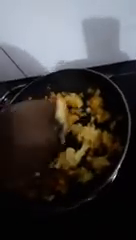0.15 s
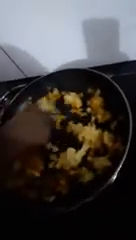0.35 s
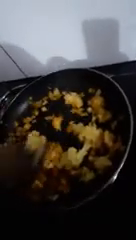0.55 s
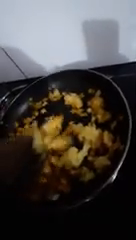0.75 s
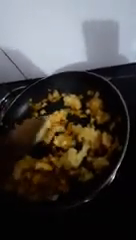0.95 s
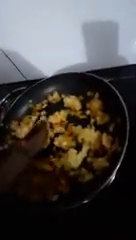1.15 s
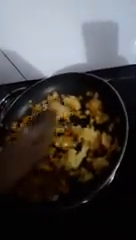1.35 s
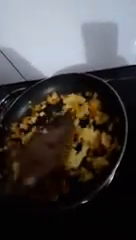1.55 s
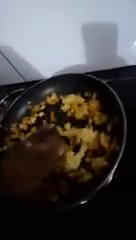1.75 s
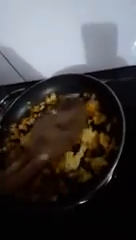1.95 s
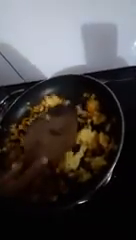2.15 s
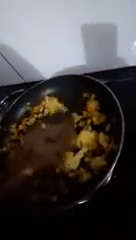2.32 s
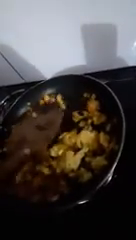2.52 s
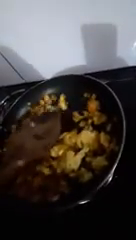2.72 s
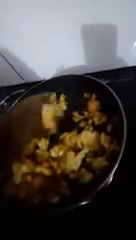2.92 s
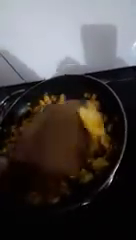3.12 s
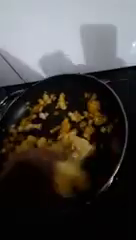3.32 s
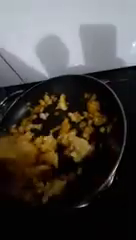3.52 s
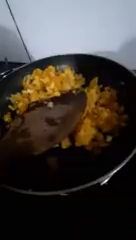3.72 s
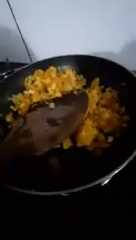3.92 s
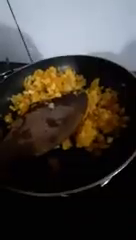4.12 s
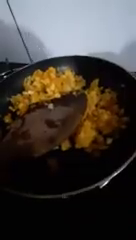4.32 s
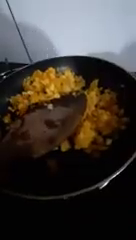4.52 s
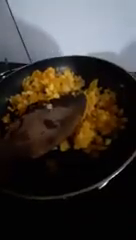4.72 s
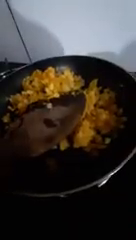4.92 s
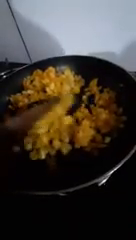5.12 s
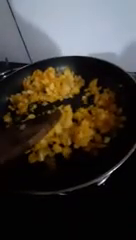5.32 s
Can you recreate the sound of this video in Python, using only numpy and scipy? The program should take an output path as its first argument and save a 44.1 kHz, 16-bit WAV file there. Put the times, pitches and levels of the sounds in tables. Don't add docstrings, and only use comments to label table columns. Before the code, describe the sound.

Steady fizzy frying, slightly to the left, with dry ticks and wet spits. A wooden spatula squelches and scrapes through mash, each push giving a low thump as the pan rocks on its stand. Short metallic knocks ring briefly with a small room answer; faint burner and room hum lie beneath the later, quieter hiss.

```python
import sys
import numpy as np
from scipy import signal
from scipy.fft import rfft, irfft, next_fast_len
from scipy.io import wavfile
from scipy.ndimage import map_coordinates

SR = 44100
rng = np.random.default_rng(int(sys.argv[2]) if len(sys.argv) > 2 else 0)


def boost(x):
    u = np.asarray(x, float) / 20
    return 10 ** u


def transcribe(u):
    v = np.clip(np.atleast_2d(u).T, -1, 1)
    q = np.round(v * 32767).astype(np.int16)
    wavfile.write(sys.argv[1], SR, q)


N = 240628
LEAD = SR // 10


def unit(x):
    return x / np.sqrt(np.mean(x ** 2) + 1e-20)


def along(points, hz):
    f, v = np.transpose(points)
    return np.interp(np.log(hz + 1), np.log(f + 1), v)


def curves(rows):
    s, *cols = np.transpose(rows)
    return [np.interp(np.arange(N) / SR, s, c) for c in cols]


def wobble(rate):
    knots = rng.standard_normal(int(N * rate / SR) + 4)
    return map_coordinates(knots, [np.arange(N) * rate / SR])


def swells(rows):
    t = np.arange(N) / SR
    return np.sqrt(sum(boost(2 * (db - 10 * np.abs(t - s) / half)) for s, half, db in rows))


def filtered(x, response):
    m = next_fast_len(N + SR // 2)
    return irfft(rfft(x, m) * response(np.fft.rfftfreq(m, 1 / SR)), m)[..., :N]


def colour(points):
    return lambda hz: boost(along(points, hz)) * np.minimum(hz / points[1][0], 1) ** 3


def sides(pan_db):
    return boost(np.array([pan_db / 2, -pan_db / 2]))


def port_lag(hz, lag_s):
    return np.exp(-1j * np.pi * hz * lag_s * np.array([[1], [-1]]))


# f/Hz, likeness/1
ALIKE = [(60, 1), (500, 0.51), (2000, 0.076), (5000, 0.11), (12000, 0.034)]


def paired(pair, response):
    def mid_side(hz):
        turn = np.arccos(np.clip(along(ALIKE, hz), -1, 1)) / 2
        return response(hz) * np.array([np.cos(turn), np.sin(turn)])
    mid, side = filtered(pair, mid_side)
    return np.array([mid + side, mid - side])


def grains(per_second, spread_db, smooth):
    size = boost(spread_db * np.minimum(rng.exponential(size=N), 3.5))
    size = size * (rng.random(N) < per_second / SR)
    decay = boost(-60 * np.arange(300) / SR / 0.0058)
    swell = np.convolve(size, decay)[:N]
    return rng.standard_normal((2, N)) * np.sqrt(smooth ** 2 + unit(swell) ** 2)


# f/Hz, level/dB, t60/s
PAN = [(279, 3, 0.065), (675, -1, 0.037), (784, 2, 0.044), (868, 6, 0.013), (1010, -3, 0.019),
       (1157, 1.5, 0.047), (1281, 2, 0.052), (1403, 6.5, 0.045), (1500, 6, 0.063), (1677, 2.5, 0.055),
       (2000, 8, 0.035), (2250, 0, 0.061), (2470, 5, 0.022), (2726, -7.5, 0.07), (3047, 1.5, 0.05),
       (3440, -1.5, 0.034), (3920, 4.5, 0.0075), (4840, -3, 0.016), (6155, -5.5, 0.044), (7020, 3, 0.01)]
# t/s, peak level/dB, low/dB, mid/dB, high/dB
EARLIER = [
    (-.01, -21, -14.5, -6, -13),
    (.038, -38, -26, -46, -37),
    (.165, -39.5, -12, -18, -26),
]
# t/s, peak level/dB, low/dB, mid/dB, high/dB
KNOCKS = [(0.7388, -21.5, -24, -3, -11.5), (0.798, -37.5, -8, -19, -21), (3.342, -38.5, -17, -8, -6),
          (3.432, -30.5, -14, 8.5, -0.5), (3.464, -37, -7, -22, -17), (3.6595, -34, -19, 1.5, 8.5),
          (3.722, -31.5, -18, -41, -21), (5.206, -35.5, 2, -17, 1.5), (5.212, -35.5, -14, 0, -24),
          (5.288, -62, 3, -14, -20), (1.896, -50, -36, -13, 15.5)]
# t/s, peak level/dB, low/dB, mid/dB, high/dB
NUDGES = [
    (1.235, -55, -29, 15, -44),
    (1.555, -42.5, -24.5, -9, -8),
    (3.765, -41.5, -21, 4.5, 9.5),
    (5.188, -49, 1, -6, 5),
]


def knocks():
    out, t = np.zeros((2, N + SR)), np.arange(SR // 3) / SR
    edge_band = signal.butter(3, [900, 7500], 'band', fs=SR, output='sos')
    contacts_s = ((EARLIER, 0.0042), (KNOCKS, 0.0026), (NUDGES, 0.016))
    blows = [(*row, contact_s) for rows, contact_s in contacts_s for row in rows]
    for s, db, low_db, mid_db, high_db, contact_s in blows:
        heard = out[:, LEAD + round(s * SR):][:, :len(t)]
        strike = [(270, low_db + 5.0), (750, 0), (1600, mid_db - 4.5),
                  (2900, (mid_db + high_db) / 2), (5000, high_db + 6.0)]
        rise = 1 - np.exp(-t / (0.4 * contact_s))
        hold = 1.35 * boost(-60 * t / (11 * contact_s)) + 0.17
        for hz, level_db, t60_s in PAN:
            turn = rng.uniform(-1.33, 1, 2)
            scatter_db = rng.normal(0, 4.1) + rng.normal(0, 1.0, (2, 1))
            phase = turn[:, None] * min(hz / 1500, 3)
            wave = np.sin(2 * np.pi * hz * (1 + 0.0086 * turn[0]) * t + phase)
            mode_db = db + 2.5 + level_db + along(strike, hz) + scatter_db - 60 * t / t60_s
            heard += boost(mode_db) * rise * hold ** min(hz / 700, 1) * wave
        crack_db = db + high_db + 8.0 - 60 * t / (7 * contact_s)
        crack = rng.standard_normal((2, len(t))) * boost(crack_db) * rise
        crack[:, 8] -= boost(db + high_db + 30.0 - 2200 * contact_s)
        heard += signal.sosfilt(edge_band, crack)
    return out


# t/s, peak level/dB,
# f/Hz, rise/s, t60/s
RINGS = [(0.0, -31, 2012, 0.0016, 0.094), (0.0, -27, 1354, 0.0018, 0.038), (0.0, -29.5, 782, 0.0075, .12),
         (0.024, -26, 717, .004, .05), (0.038, -21, 725, 0.002, 0.025), (0.055, -25, 705, 0.003, 0.03),
         (0.066, -38, 2050, .004, .06), (0.123, -38, 686, .002, .04), (0.2, -41.5, 760, 0.0074, 0.089),
         (0.74, -21.5, 283, 0.005, 0.057), (0.742, -27, 697, 0.0033, .05), (0.752, -33, 1330, .004, 0.094),
         (0.02, -29.5, 1000, .004, 0.055), (0.739, -34, 1500, 0.0011, 0.046),
         (3.665, -36, 1152, 0.0045, 0.18), (3.66, -21.5, 1500, .0007, 0.025),
         (3.66, -28.5, 854, .001, .025), (3.66, -28, 2300, .0006, 0.013), (3.66, -24, 4000, .0004, .012),
         (3.729, -30, 690, .003, .03), (3.768, -32, 760, .004, .03), (3.766, -30, 1960, 0.0079, 0.11),
         (3.775, -36, 2440, .008, 0.077), (3.748, -37, 690, 0.0069, 0.13), (3.35, -41, 2430, .004, .06),
         (5.288, -41, 296, 0.0037, 0.049), (0.75, -30, 2035, 0.0082, 0.13), (0.766, -28, 760, .005, .04),
         (0.794, -27, 720, 0.005, .035), (1.225, -40, 1461, .02, 0.23), (1.248, -38.5, 776, .008, 0.077),
         (1.565, -39.5, 660, 0.01, 0.11), (1.572, -42, 1307, 0.0063, 0.094), (1.755, -44, 784, .008, 0.069),
         (1.74, -40, 1500, .008, 0.069), (1.775, -44, 1294, 0.008, 0.081),
         (3.341, -30.5, 650, 0.0025, .08), (3.432, -16.5, 910, 0.00068, 0.018),
               (3.432, -26, 1500, 0.0011, .07), (3.432, -27.5, 1284, .001, 0.045),
               (3.46, -37, 817, .004, 0.065), (3.497, -36, 2050, .005, .04), (3.481, -36, 1450, .004, .04),
               (3.432, -22, 4600, .0003, .009), (3.436, -30, 280, .003, 0.088),
               (3.432, -25, 6800, 0.00027, 0.007), (3.343, -37, 298, .004, 0.075),
               (3.464, -32, 910, .002, .03), (3.721, -27, 620, 0.0022, 0.045),
               (5.207, -21, 268, 0.0061, 0.065), (5.208, -30, 426, 0.0043, .05),
               (5.21, -29.5, 890, .003, 0.048), (5.23, -32, 1183, 0.0028, 0.05),
               (5.232, -38, 327, .004, 0.037), (5.25, -37, 1400, .004, .05), (5.212, -34, 705, .002, .03),
               (5.335, -53, 1950, .01, .2), (5.265, -41.5, 250, 0.0045, 0.047), (5.31, -54, 898, .02, 0.38)]


def rings():
    out, t = np.zeros(N + SR), np.arange(SR // 3) / SR
    for s, db, hz, rise_s, t60_s in RINGS:
        level = boost(db + 3 - 60 * t / t60_s) * (1 - np.exp(-(t / rise_s) ** 2))
        out[LEAD + round(s * SR):][:len(t)] += level * np.sin(2 * np.pi * hz * t)
    return out


# t/s, peak level/dB, push or pull/1, half width/s
CLICKS = [
    (0.7394, -14.5, -1, .00016),
    (3.4326, -3.5, -1, 0.000082),
    (3.6601, -5.5, 1, 0.000077),
    (3.6608, -19, -1, .00012),
    (5.2073, -22, 1, .00006),
    (5.2142, -25, -1, .0002),
]


def clicks():
    t = np.arange(N + SR) / SR - .1
    out = np.zeros(N + SR)
    for s, db, way, half_s in CLICKS:
        middle = LEAD + round(s * SR)
        at = slice(middle - 90, middle + 90)
        u = (t[at] - s) / half_s
        out[at] += way * boost(db) * (1 - u ** 2) * np.exp(-u ** 2 / 2)
    return out


def skids():
    t = np.arange(N) / SR
    whole, upper = 0, 0
    for s, db, _, mid_db, _ in EARLIER + KNOCKS:
        fall_db = 60 * np.where(t < s, (s - t) / 0.041, (t - s) / 0.24)
        power = boost(2 * (min(db - 5, -35) - fall_db))
        whole = whole + power
        upper = upper + power * boost(2 * (-3.5 + 0.47 * mid_db))
    return np.sqrt(whole), np.sqrt(upper)


def steel(modes):
    def response(f):
        total = 0
        for k, (c, db, t60_s) in enumerate(modes):
            peak = 1j * f * 30 / (c * c - f * f + 1j * f * 4 / t60_s)
            total = total + boost(db - 2.0 * c / 1000) * peak * (-1) ** k
        return total
    return response


# t of most pressure/s, half length/s, squelch level/dB,
# pan ringing above it/dB, spray above it/dB
STROKES = [(0.0, .06, -50, -6, -5), (0.244, 0.21, -65.5, 10.5, 20), (0.462, 0.071, -49, -6, -3),
           (0.735, 0.04, -46, -23, 0), (1.07, 0.037, -49, -2, -10), (1.25, 0.072, -46.5, -1, 6),
           (1.59, 0.12, -47, -3.5, -1), (1.762, 0.1, -51, 3.5, 4), (2.064, 0.34, -55.5, -15, -7),
           (2.184, 0.22, -52, -4, 7), (2.79, 0.045, -49.5, -8, 1), (3.285, 0.064, -44, -25, 4),
           (3.356, 0.06, -44.5, -8.5, 4), (3.664, 0.037, -48, -12, -7), (3.76, 0.037, -41.5, -1.5, 6.5),
           (4.472, 0.021, -59, -1, -4), (5.019, 0.038, -51, -12, 9), (5.179, 0.084, -51.5, -11, 4.5),
           (5.383, 0.23, -65.5, 10, -3)]
# f/Hz, level/dB per Hz
MASH = [(1060, -14), (1800, -8), (2010, -7), (2540, -4), (3100, 0.5), (4300, -1), (5290, 2.5), (5730, -3),
        (6000, -0.5), (7800, -57), (13200, -120)]


def drag():
    strength, (skid, bright) = boost(curves(SIZZLE)[0]), skids()
    tremble, simmer = boost(-17.5) * strength, boost(-12) * strength
    rub = np.hypot(tremble, swells([(s, half, db + up) for s, half, db, up, _ in STROKES]))
    squelch = np.hypot(simmer, swells([row[:3] for row in STROKES]))
    slips = grains(per_second=200, spread_db=0, smooth=2.3)
    contact = np.hypot(rub, skid)
    force = contact * boost(0.66 * wobble(22.24))
    upper = np.clip(np.hypot(boost(-1) * rub, bright) / contact, 0, .98)
    ring = 0
    for share, modes in ((np.sqrt(1 - upper ** 2), PAN[1:4]), (upper, PAN[4:11])):
        response = steel(modes)
        ring = ring + paired(force * share * slips, response) / np.std(paired(slips, response))
    mash = unit(paired(grains(per_second=300, spread_db=3.5, smooth=2.5), colour(MASH)))
    wet = np.hypot(squelch, boost(-9.5) * skid)
    return ring + wet * boost(3.0 + 1.3 * wobble(25.38)) * mash


# t of most force/s, level/dB, build-up for 60 dB/s, t60/s, bright above it/dB
SCRAPES = [(0.0, -33, .002, 0.36, 0), (0.742, -38, 0.06, 0.33, -1.5), (3.345, -38, 0.01, 0.11, -4),
           (3.436, -36, 0.01, 0.19, 1.5), (3.664, -39, 0.02, 0.09, 9.5), (3.724, -40.5, 0.1, .1, -2),
           (3.781, -40, 0.13, 0.043, 6.5), (5.208, -34.5, 0.07, 0.15, -4), (5.235, -41, 0.18, 0.11, -5),
           (5.292, -55, 0.4, .1, 2), (1.26, -64, -0.05, .12, -5), (0.42, -56.5, 0.1, .12, 6)]
# f/Hz, level/dB per Hz
DULL = [(120, -34), (220, 0), (520, -3), (850, -4), (1400, -19), (3000, -60)]
# f/Hz, level/dB per Hz
BRIGHT = [(600, -26), (1000, -14), (1600, 2.5), (2400, -1), (3600, -7.5), (6000, -14), (9000, -65)]


def grit():
    t = np.arange(N) / SR
    dull, bright = 0, 0
    for s, db, rise_s, t60_s, bright_db in SCRAPES:
        fall_db = 60 * np.where(t < s, (s - t) / abs(rise_s), (t - s) / t60_s)
        power = boost(2 * (db - fall_db))
        dull = dull + power
        bright = bright + power * boost(2 * bright_db)
    slips = grains(per_second=150, spread_db=3.0, smooth=1.9)
    body, edge = unit(paired(slips, colour(DULL))), unit(paired(slips, colour(BRIGHT)))
    return np.sqrt(dull) * body + np.sqrt(bright) * edge


# t/s, peak level/dB, f/Hz
THUMPS = [(0.102, -38.5, 126), (0.745, -37.5, 120), (0.967, -41, 140), (1.244, -39, 147), (1.795, -41, 137),
          (2.087, -41, 117), (2.301, -40.5, 140), (2.59, -40.5, 142), (2.864, -39.5, 131),
          (3.096, -41.5, 114), (3.372, -36.5, 136), (3.437, -48, 216), (3.668, -42, 140), (3.812, -34, 123),
          (4.707, -42, 118), (4.831, -45.5, 145), (4.971, -42, 134), (5.185, -36, 126), (5.334, -38, 143)]


def thumps():
    before = SR // 50
    out, t = np.zeros(N + SR), np.arange(-before, SR // 12) / SR
    for s, db, hz in THUMPS:
        u = t * hz
        rebound = 0.68 * np.exp(-(u / 0.72) ** 2) + 0.091 * np.exp(-u / 0.56)
        swell = np.where(u < 0, np.exp(-(u / 0.68) ** 2), rebound)
        foot = 0.68 * np.exp(-(u / 0.046) ** 2)
        push = np.cos(2 * np.pi * u) * swell + foot
        out[LEAD - before + round(s * SR):][:len(t)] += boost(db + 1.5) * push
    f = np.fft.rfftfreq(len(out), 1 / SR)
    counter = 1 + .6j * f * 25 / (60 ** 2 - f * f + 1j * f * 14)
    return irfft(rfft(out) * counter * port_lag(f, lag_s=0.00032), len(out))


# t/s, level/dB, left-right/dB
SIZZLE = [(0.0, -45.5, 5), (0.3, -46.5, 4.5), (0.6, -44, 5), (0.8, -43, 4), (1.1, -41.5, 4.5),
          (1.45, -44, 4), (1.9, -43.5, 2.5), (2.1, -46, 4.5), (2.6, -43, 3.5), (3.1, -44.5, 5),
          (3.5, -46, 2.5), (3.72, -41.5, 7.5), (3.96, -45, 6), (4.02, -52.5, 6), (4.28, -54.5, 11.5),
          (4.45, -50.5, 4.5), (4.95, -52.5, 8.5), (5.46, -51.5, 7)]
# t/s, half length/s, level/dB
FLARES = [
    (1.533, 0.031, -40),
    (1.6, 0.093, -41.5),
    (1.757, 0.073, -48),
    (3.29, .08, -42),
]
# f/Hz, level/dB per Hz
FIZZ = [(2650, -3), (4500, -10.5), (5280, -10), (5740, -3), (6550, 4), (7970, -3.5), (8680, -17.5),
        (9500, -21.5), (12400, -48), (20900, -120)]
# f/Hz, level/dB per Hz
SPRAY = [(5000, -36), (8500, -20), (9520, -10.5), (10900, -2), (11700, 0), (13900, -1), (15200, -6),
         (16000, -0.5)]


def sizzle():
    strength_db, pan_db = curves(SIZZLE)
    bare, stirred = boost(strength_db) * sides(pan_db), sides(4.5)[:, None]
    stir_fizz = swells([(s, half, db + 0.5) for s, half, db, *_ in STROKES] + FLARES)
    stir_spray = swells([(s, half, db + up) for s, half, db, _, up in STROKES])
    coarse = np.hypot(boost(-4.5) * bare, stirred * stir_fizz)
    fine = np.hypot(bare, stirred * stir_spray)
    bursts = grains(per_second=360, spread_db=4.0, smooth=1.94)
    flicker_db = 0.5 * wobble(17) + 0.5 * wobble(45)
    fizz = boost(0.31 * wobble(29.7)) * unit(paired(bursts, colour(FIZZ)))
    spray = unit(paired(bursts, colour(SPRAY)))
    return boost(2.0 + flicker_db) * (coarse * fizz + fine * spray)


def burst_layers(bubbles):
    out, t = np.zeros((3, 2, N + SR)), np.arange(500) / SR
    for s, db, splat_db, spray_db, pan_db, length_s in bubbles:
        u = t / length_s
        shape = (1 - np.exp(-6 * u)) * np.exp(-2.5 * u)
        burst = unit(rng.standard_normal(len(t)) * shape) * np.sqrt(u.max()) * 0.16
        levels = boost(db + np.array([splat_db + 12.5, 3, spray_db + 4.5]))[:, None, None]
        out[..., round((s + .0007) * SR):][..., :len(t)] += levels * sides(pan_db)[:, None] * burst
    spectra = (MASH, FIZZ, SPRAY)
    return sum(filtered(part[:, :N], colour(points)) for part, points in zip(out, spectra))


# t/s, peak level/dB, spray/dB, left-right/dB
POPS = [(0.148, -30.5, 1.5, 10), (0.391, -32.5, 0, 17), (0.5468, -29.5, 0, 11), (0.6935, -31, -4, 13),
        (0.802, -34, -4, 13), (1.0318, -31, 7, 10), (1.2085, -31, 0.5, 11), (1.4331, -30.5, -10, 9),
        (1.4768, -23, -18, 5.5), (1.5295, -36.5, 6, 12), (1.5957, -29, -29, 23), (1.7267, -33, 1.5, 16),
        (1.9666, -36, -14, 16), (2.009, -43, 4, 29), (2.361, -37, -16, 10), (3.15, -31, -5, -11),
        (3.715, -31, 5, -1), (3.837, -31, 3.5, 7), (3.857, -47, 13, 14), (3.8862, -38, 12, 11),
        (3.9335, -45, -10, 3), (0.261, -38.5, 3, 9), (5.011, -39, -6, -5), (5.018, -41.5, 9, -9),
        (5.127, -34.5, -10, 9)]
# t/s, peak level/dB, spray/dB, left-right/dB
MORE_POPS = [(0.4813, -43, 5, 5), (0.7347, -40, 8, 6), (0.8864, -42, 5, 9), (1.0545, -52, -6, -13),
             (1.2481, -35, 4, 3), (1.3071, -29, -12, 4), (1.449, -38, -1, 5), (1.626, -39, -11, 2),
             (1.8153, -40, -1, 2), (1.9865, -41, -12, -1), (2.0454, -37, -10, 2), (2.6628, -35, -13, 5),
             (2.9731, -44, 4, 13), (3.4201, -37, -4, 14), (3.531, -43, 6, 8), (3.561, -42, 4, 8),
             (3.6097, -46, 9, 8), (3.6496, -37.5, 6.5, 9), (3.68, -43, 9, 14), (3.697, -43, 9, 10),
             (3.803, -47, 0, 10), (3.8167, -38, 5, 8), (3.8706, -39, 10, 10), (3.912, -44, 8, 6),
             (3.9584, -43, 9, 6), (3.972, -34, -1, 2), (4.9955, -50, 11, -10)]
# t/s, peak level/dB, low
# splat/dB, spray/dB, left-right/dB
SPLATS = [(0.418, -30, -32, -28, 12), (0.759, -31.5, -15, 1, 12), (0.9772, -38, -5.5, -2, 15),
          (1.0663, -29.5, -25, -20, 17.5), (1.506, -27.5, -13, -6, 11), (1.669, -33.5, -30, -6, 19),
          (1.897, -30, -10.5, -13, 22.5), (2.132, -38, -7.5, -1, 12), (2.434, -41, 0, -9, 4),
          (2.505, -35.5, -18, 1, 8), (2.5813, -29, -22, 4, 21), (3.2188, -30, -9, 5, 7),
          (3.291, -37, -19, -27, 3), (3.3556, -31, -15, -13, 9), (3.432, -25, -4, -39, 12),
          (3.5074, -33, -19, -1, 6), (3.576, -30.5, -13, -7, 6), (3.629, -43, -13, 4, 0),
          (3.66, -28, 6, -14, 8), (3.8706, -34, -17, 3, -2), (5.071, -37, -16, -25, 6),
          (5.2073, -29, -15, -21, 17)]
# t/s, peak level/dB, low splat/dB, spray/dB, left-right/dB
SPITS = [
    (2.578, -16, -28, 0, 6),
    (2.582, -28.5, -31, -6, 23.5),
    (5.444, -28, -23, -6, 12.5),
]


def pops():
    dry_splat_db = -38
    bubbles = [(s, db, dry_splat_db, *rest, 0.0019) for s, db, *rest in POPS]
    bubbles += [(*row, 0.0019) for row in SPLATS]
    bubbles += [(*row, 0.005) for row in SPITS]
    bubbles += [(s, db, dry_splat_db, *rest, 0.0022) for s, db, *rest in MORE_POPS]
    return burst_layers(bubbles)


# f/Hz, t60/s
KITCHEN = [(100, 0.26), (600, 0.38), (2000, 0.38), (6000, 0.42), (14000, 0.17)]


def kitchen(x):
    out, step = np.zeros((2, x.shape[1] + SR)), SR // 4
    for start in range(0, x.shape[1], step):
        hz, t, z = signal.stft(rng.standard_normal((2, SR // 2)), SR, nperseg=256)
        share = np.clip(along(ALIKE, hz), 0, 1)[:, None]
        z[1] = share * z[0] + np.sqrt(1 - share ** 2) * z[1]
        decay = boost(-60 * t / along(KITCHEN, hz)[:, None])
        tail = signal.istft(z * decay, SR, nperseg=256)[1]
        wet = signal.fftconvolve(x[:, start:start + step], tail / np.linalg.norm(tail[0]), axes=1)
        out[:, start + 150:][:, :wet.shape[1]] += wet
    return out[:, :x.shape[1]]


# t/s, level/dB
JOLTS = [
    (0.0, -47.5),
    (3.452, -49),
    (3.722, -53.5),
    (4.62, -58.5),
    (3.2, -66.5),
    (5.25, -55),
]
# f/Hz, level/dB per Hz
RUMBLE = [(20, -30), (45, -1.5), (90, -5), (150, -4.5), (190, -3.5), (230, -12.5), (330, -10.5), (520, -13),
          (700, -24), (1200, -28.5)]


def hum():
    strength_db = curves(SIZZLE)[0]
    busy = boost(0.21 * (strength_db - strength_db.mean()))
    jolt = swells([(s, 0.078, db) for s, db in JOLTS])
    room, breath = rng.standard_normal((2, 2, N))
    rumble = np.hypot(boost(-64) * busy, jolt) * boost(4.5 + 0.72 * wobble(4.9))
    rumble = rumble * unit(paired(room, colour(RUMBLE)))
    burner = lambda f: f * 30 / (443 ** 2 - f * f + 1j * f * 22)
    whistle = np.hypot(boost(-63.5) * busy, boost(-9.0) * jolt) * boost(0.48 * wobble(3.8))
    return rumble + whistle * unit(paired(breath, burner))


# f/Hz, level/dB per Hz
QUIET = [(710, -35), (1200, -5), (1570, -2), (1870, -31), (2090, -12), (2920, -7.5), (3710, 3.5),
         (5600, -39), (7280, -38), (12300, -120)]


def hiss():
    return boost(-63) * unit(paired(rng.standard_normal((2, N)), colour(QUIET)))


def scene():
    pan = sides(0.83)[:, None] * (knocks() + rings() + clicks())
    stand = thumps()
    blows = pan + stand + kitchen(boost(-8) * pan + boost(-3.5) * stand)
    blows = blows[:, LEAD:][:, :N]
    return blows + drag() + grit() + sizzle() + pops() + hum() + hiss()


# f/Hz, left-right/dB
LEAN = [(100, -1.5), (400, -2.5), (900, -2), (2500, -3), (5000, -1), (12000, 1.5)]


def two_ports(dry):
    def response(hz):
        band = (1j * hz / (35 + 1j * hz)) ** 2 * np.clip((16000 - hz) / 50, 0, 1)
        return sides(along(LEAN, hz)) * port_lag(hz, lag_s=.0001) * band
    return filtered(dry, response)


def low_pass(x):
    return signal.sosfilt(signal.butter(12, 16000, fs=SR, output="sos"), x)


def record(dry):
    heard = two_ports(dry)
    mix = heard / (1 + np.abs(heard / .86) ** 6) ** (1 / 6)
    return low_pass(mix)


dry = scene()
out = record(dry)
transcribe(out)
```